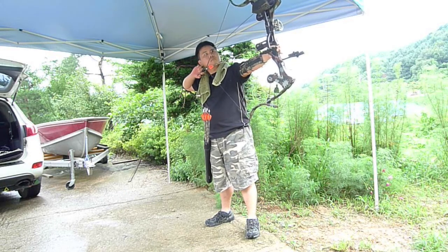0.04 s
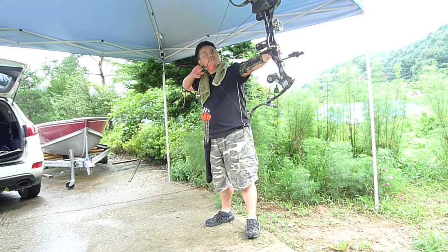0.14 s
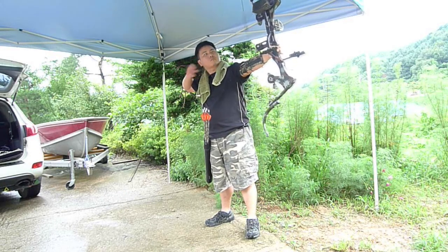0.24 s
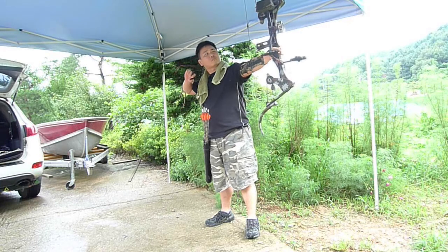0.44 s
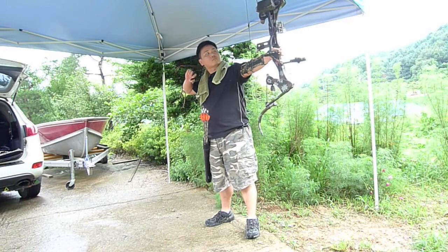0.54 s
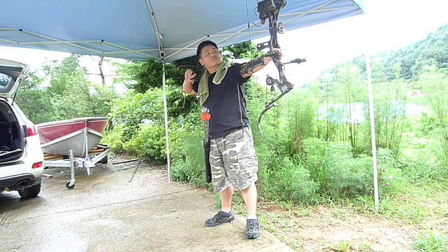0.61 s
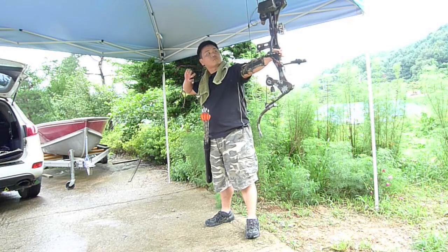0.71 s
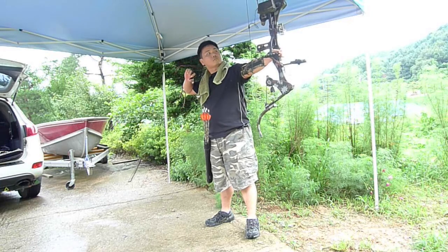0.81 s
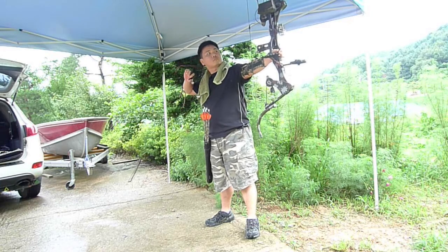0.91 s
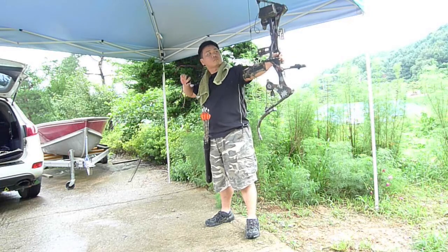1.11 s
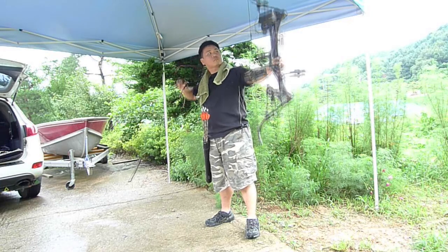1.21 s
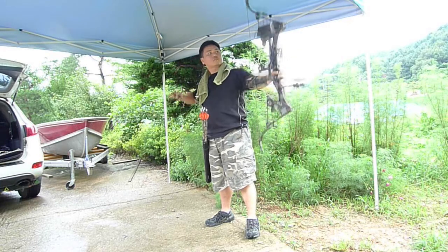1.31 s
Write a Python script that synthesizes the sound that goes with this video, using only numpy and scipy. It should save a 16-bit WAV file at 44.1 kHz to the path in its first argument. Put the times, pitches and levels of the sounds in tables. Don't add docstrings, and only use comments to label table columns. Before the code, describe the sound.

A compound bow shot outdoors. Faint airy wash, then a tiny trigger rattle at 0.23 s and a sharp, loud string slap at 0.25 s, with clattering, ringing limbs and a brief hum. Small loose ticks follow from 0.38 to 0.49 s. At 0.66 s the arrow hits a target with a short dry thud. From about 0.78 s a blurred hillside echo fades into quiet air. Dull, slightly gritty camera microphone.

```python
import sys
import numpy as np
from scipy import signal
from scipy.fft import rfft, irfft, next_fast_len
from scipy.io import wavfile
from scipy.ndimage import uniform_filter1d

SR = 44100
rng = np.random.default_rng(int(sys.argv[2]) if len(sys.argv) > 2 else 0)


def gain_from_db(level_db):
    decades = np.asarray(level_db, float) / 20
    return 10 ** decades


def transcribe(signal):
    frames = np.atleast_2d(signal).T
    limited = np.clip(frames, -1, 1)
    pcm = np.round(limited * 32767).astype(np.int16)
    wavfile.write(sys.argv[1], SR, pcm)


N = 59535
T = np.arange(N) / SR
SLAP_S, THUD_S = .2552, .6625

# [f/Hz, level/dB, t60/s, swell/s]
BOW_RINGS = [(140, -46, .5, .01), (335, -42, .2, .01), (590, -44, .3, .06), (900, -35, .2, .01),
             (1044, -39, .27, .01), (1160, -34, .17, .012), (1405, -43, .4, .01), (1500, -40, .12, .008),
             (1676, -38, .3, .02), (2080, -42, .12, .005), (2585, -41, .2, .02), (2790, -46, .13, .015),
             (2970, -46, .13, .01)]
# [f/Hz, level/dB]
CLATTER_COLOUR = [(100, -30), (250, -9), (450, -7), (1150, -1.5), (1600, -4), (2600, -8), (3600, -11.5),
                  (6000, -31.5)]
# [t/s, level/dB, f/Hz]
LOOSE_TICKS = [
    (.385, -32.5, 1890),
    (0.412, -40.5, 2690),
    (0.4438, -41, 3240),
    (0.4873, -46, 3200),
]
# [f/Hz, width/Hz, level/dB]
JAW_BODY = [(390, 90, -5), (1400, 500, 0), (2800, 1600, 0)]
# [t/s, level/dB, f/Hz, t60/s]
JAW_KNOCKS = [
    (.2349, -33, 1400, .015),
    (.2352, -40, 390, .04),
    (.2395, -33, 3300, .015),
]
# [f/Hz, level/dB, t60/s]
TARGET_RINGS = [(930, -28, .03), (1650, -33, .04), (2200, -38, .03), (3100, -38, .025)]
# [f/Hz, level/dB]
PUFF_COLOUR = [(100, -14), (400, 4), (900, 3.5), (1500, -1), (2300, -7.5), (3500, -11), (4300, -28),
               (6000, -35)]
# [f/Hz, level/dB]
SLOPE_COLOUR = [(200, -30), (750, -14), (1000, -2), (1400, -2), (1800, -6), (2400, 1), (2900, -18),
                (6000, -40)]
# [f/Hz, level/dB]
AIR_COLOUR = [(25, -31), (70, -4.5), (200, -1), (1000, -5.5), (3000, -13.5), (4500, -28), (9000, -36.5),
              (13000, -58)]
# [f/Hz, level/dB]
MIC_RESPONSE = [(40, -26), (160, 0.5), (3400, -1.5), (4000, -4.5), (4600, -14.5), (5300, -18),
                (5900, -36.5), (9000, -76)]
# [f/Hz, level/dB]
MIRROR_COLOUR = [(8000, -55), (10000, -10), (11000, -15), (12000, -19.5), (12800, -24.5), (14000, -37),
                 (14350, -31), (14600, -83)]
# [t/s, size, settle/s, swing f/Hz]
OFFSET_JOLTS = [
    (.2555, .0165, .105, 2.9),
    (.6625, .0095, .032, 2.2),
]


def coloured(x, points):
    f, db = np.transpose(points)
    size = next_fast_len(2 * N)
    hz = np.fft.rfftfreq(size, 1 / SR)
    gain = gain_from_db(np.interp(np.log(hz + 1), np.log(f + 1), db))
    return irfft(rfft(x, size) * gain, size)[:N]


def evened(x):
    return x / np.sqrt(np.mean(x ** 2) + 1e-20)


def slow_noise(smooth):
    return evened(uniform_filter1d(rng.standard_normal(N), size=smooth))


def fade(start, t60):
    return gain_from_db(-60 * np.maximum(T - start, 0) / t60)


def shape(start, rise, hold, t60):
    t = T - start
    return np.clip(t / rise, 0, 1) * gain_from_db(-60 * np.maximum(t - rise - hold, 0) / t60)


def ring(start, db, hz, t60, rise, waver=0.):
    drift = waver * evened(uniform_filter1d(rng.standard_normal((2, N)), size=500))
    turns = hz * (T - start) + np.cumsum(hz * drift[0]) / SR
    return gain_from_db(db + 120 * drift[1]) * shape(start, rise, 0, t60) * np.sin(2 * np.pi * turns)


def knocks():
    per_s, spread_db = 5000, 2.2
    size = gain_from_db(spread_db * np.minimum(rng.exponential(1, N), 4))
    clicks = size * rng.standard_normal(N) * (rng.random(N) < per_s / SR)
    return clicks + .25 * rng.standard_normal(N)


def string():
    whip_s, rise_s, from_hz, to_hz = .2535, .005, 2000, 3450
    speed = np.clip((T - whip_s) / rise_s + 1, 0, 1)
    turns = np.cumsum(from_hz + (to_hz - from_hz) * speed) / SR
    flutter = 1 + .3 * slow_noise(30)
    loudness = gain_from_db(-17) * speed ** 3 * (T < SLAP_S + .001) * fade(whip_s, t60=.02)
    whip = loudness * flutter * np.sin(2 * np.pi * turns)
    snap = gain_from_db(-17) * shape(SLAP_S, .0003, 0, t60=.014) * rng.standard_normal(N)
    rebound = ring(.2568, db=-21, hz=3100, t60=.018, rise=.00068, waver=.03)
    slap = ring(SLAP_S, db=-13, hz=1900, t60=.003, rise=.00031)
    push = ring(SLAP_S, db=-29.5, hz=191, t60=.032, rise=.00067)
    return whip + snap + rebound - slap + push


def bow():
    rise_s, hold_s = .0073, .021
    rattle = evened(coloured(knocks(), CLATTER_COLOUR))
    clatter = gain_from_db(-28.5) * rattle * shape(SLAP_S, rise_s, hold_s, t60=.39)
    high_pass = signal.butter(2, 2200, "high", fs=SR, output="sos")
    bright = evened(signal.sosfilt(high_pass, knocks()))
    fizz = gain_from_db(-33) * bright * shape(SLAP_S, rise_s, hold_s, t60=.15)
    rings = sum(ring(SLAP_S, db, hz, t60, swell, waver=.00706) for hz, db, t60, swell in BOW_RINGS)
    ticks = sum(ring(s - .001, db, hz, t60=.0067, rise=.0013) for s, db, hz in LOOSE_TICKS)
    return clatter + fizz + rings + ticks


def twang():
    hum = ring(SLAP_S, db=-36.5, hz=263, t60=.73, rise=.024, waver=.0035)
    hum = hum * fade(.385, t60=.08)
    sag_s, from_hz, hz_per_s = .39, 650, 600
    t = T - sag_s
    turns = from_hz * t - hz_per_s * t ** 2 / 2
    loudness = gain_from_db(-53) * shape(sag_s, .02, 0, t60=2.5) * (t < .15)
    cable = loudness * gain_from_db(2.3 * slow_noise(900)) * np.sin(2 * np.pi * turns)
    return hum + cable


def release():
    x = knocks()
    body = 0
    for hz, width, db in JAW_BODY:
        resonance = signal.iirpeak(hz, hz / width, SR)
        body = body + gain_from_db(db) * evened(signal.lfilter(*resonance, x))
    chatter = gain_from_db(-38) * evened(body) * shape(.2348, .0013, hold=.007, t60=.07)
    return chatter + sum(ring(s, db, hz, t60, rise=.00073) for s, db, hz, t60 in JAW_KNOCKS)


def arrow():
    tip = ring(.6611, db=-14, hz=2450, t60=.003, rise=.00031)
    thud = ring(THUD_S, db=-10, hz=587, t60=.0056, rise=.00074)
    boom = ring(THUD_S, db=-25, hz=311, t60=.04, rise=.00028)
    body = sum(ring(THUD_S + .00094, db, hz, t60, rise=.001) for hz, db, t60 in TARGET_RINGS)
    puff = gain_from_db(-36) * shape(THUD_S, .0024, 0, t60=.06)
    yard = gain_from_db(-40) * shape(THUD_S, .013, 0, t60=.45)
    scatter = (puff + yard) * evened(coloured(knocks(), PUFF_COLOUR))
    return tip - thud - boom + body + scatter


def slope(x):
    delay_s = .527
    near = shape(delay_s, .002, 0, t60=.03) * rng.standard_normal(N)
    trees = rng.standard_normal(N) * (rng.random(N) < .02)
    far = shape(delay_s, .21, 0, t60=1.4) * trees
    taps = gain_from_db(-18) * near / np.linalg.norm(near) + gain_from_db(-20) * far / np.linalg.norm(far)
    return coloured(signal.fftconvolve(x, taps)[:N], SLOPE_COLOUR)


def air():
    frames = N // 256 + 5
    a, b, patches = rng.standard_normal((frames, 513, 3)).T
    for axis in (0, 1):
        patches = uniform_filter1d(patches, size=10, axis=axis)
    spectrum = (a + 1j * b) * gain_from_db(1.2 * evened(patches))
    x = signal.istft(spectrum, nperseg=1024, noverlap=768)[1][:N]
    edge_hz = 13500
    wash = coloured(x, AIR_COLOUR + [(edge_hz, -44), (edge_hz + 300, -90)])
    whine = gain_from_db(-92) * np.sin(2 * np.pi * 6680 * T)
    return gain_from_db(-54) * evened(wash) + whine


def capsule(x):
    click = coloured(np.eye(1, N, 1024)[0], np.multiply(MIC_RESPONSE, [1, 2]))[:2049]
    return signal.oaconvolve(x, signal.minimum_phase(click, method="homomorphic"))[:N]


def scene():
    shot = string() + bow() + twang() + release()
    return (capsule(shot + arrow() + slope(shot)) + air())[None]


def top_cut(x):
    return signal.sosfilt(signal.butter(12, 14750, fs=SR, output="sos"), x)


def record(dry):
    x = dry[0]
    clock_hz, gate_hz, gate_db = 16000, 13500, -46.5
    mirror = 2 * x * np.cos(2 * np.pi * clock_hz * T)
    mirror = coloured(mirror, [(1, -120)] + MIRROR_COLOUR)
    top = coloured(mirror, [(gate_hz - 100, -120), (gate_hz + 100, 0)])
    quiet = uniform_filter1d(x ** 2, size=1024) < gain_from_db(gate_db) ** 2
    mirror = mirror - top * uniform_filter1d(quiet * 1., size=512)
    offset = -.0056
    for s, size, settle, hz in OFFSET_JOLTS:
        swing = np.cos(2 * np.pi * hz * (T - s))
        offset = offset + size * shape(s, .004, 0, t60=settle * np.log(1000)) * swing
    return top_cut((x + mirror + offset)[None])


dry = scene()
out = record(dry)
transcribe(out)
```